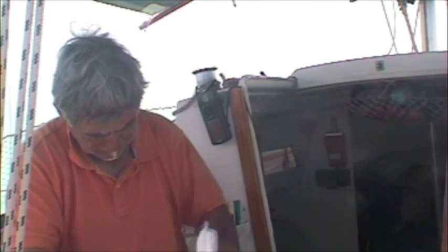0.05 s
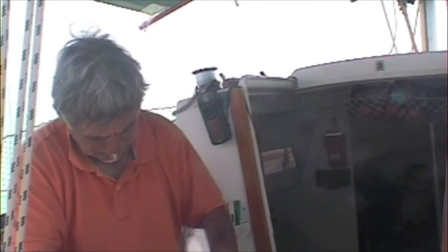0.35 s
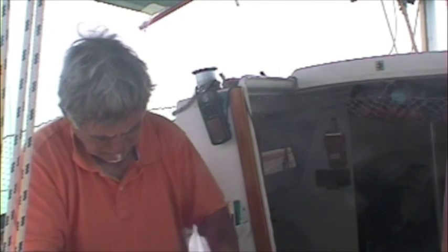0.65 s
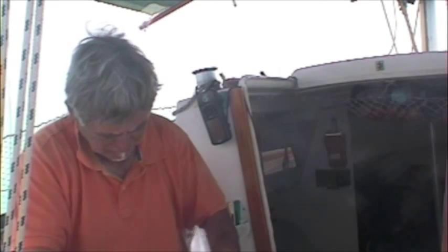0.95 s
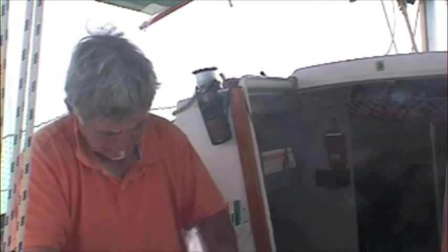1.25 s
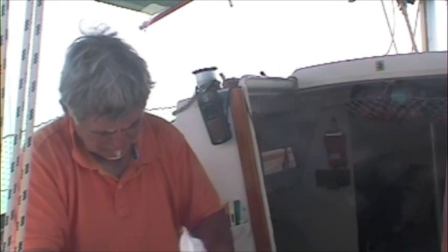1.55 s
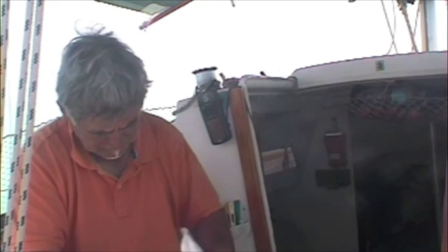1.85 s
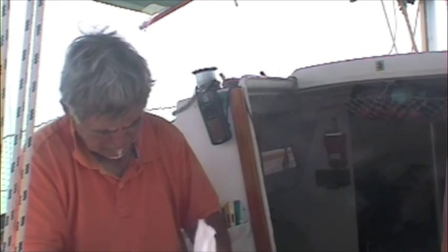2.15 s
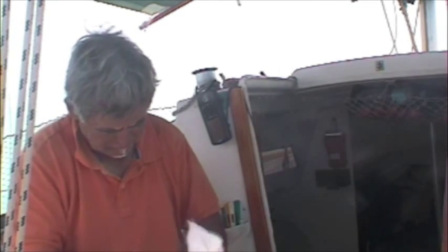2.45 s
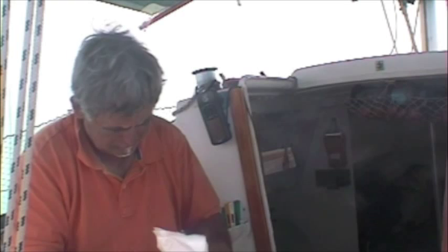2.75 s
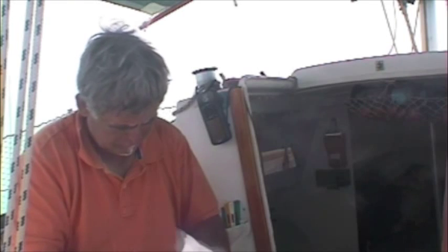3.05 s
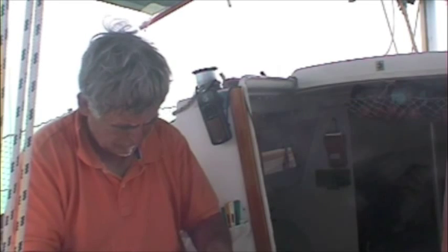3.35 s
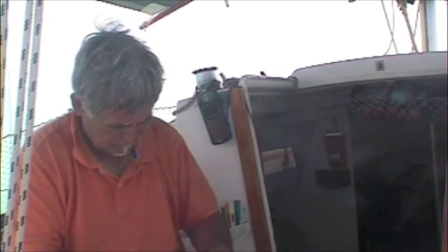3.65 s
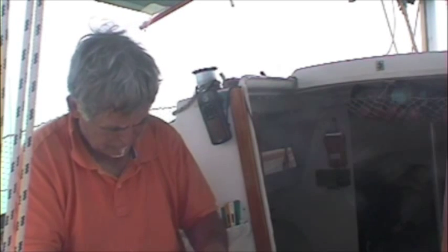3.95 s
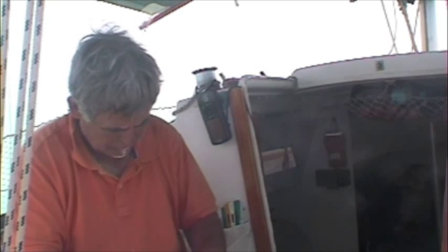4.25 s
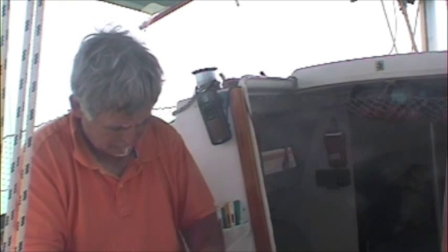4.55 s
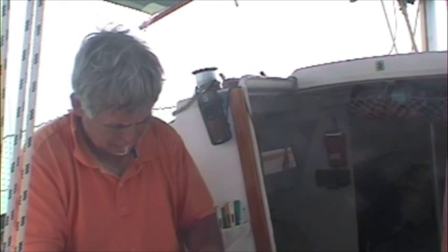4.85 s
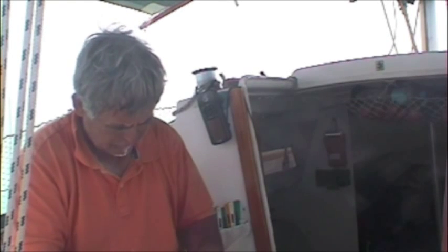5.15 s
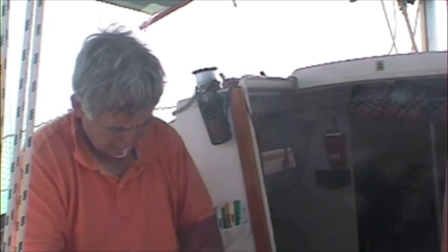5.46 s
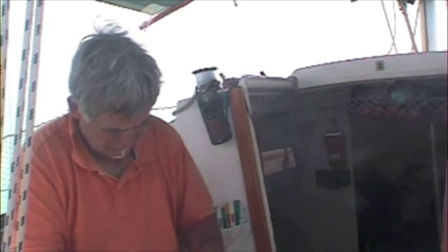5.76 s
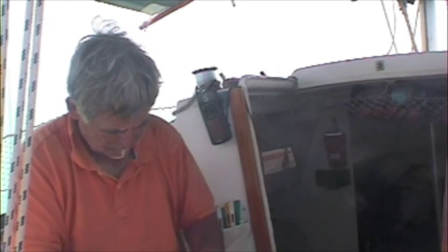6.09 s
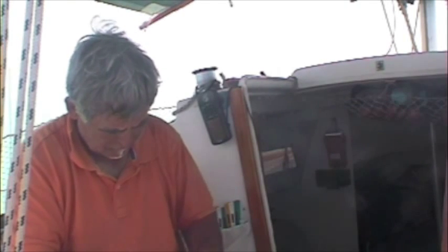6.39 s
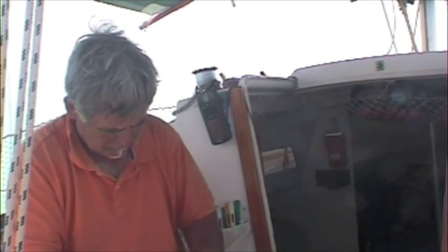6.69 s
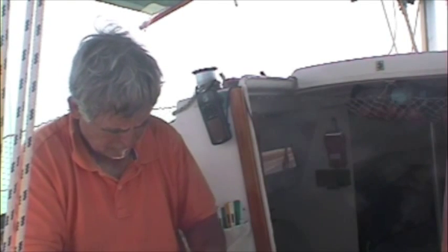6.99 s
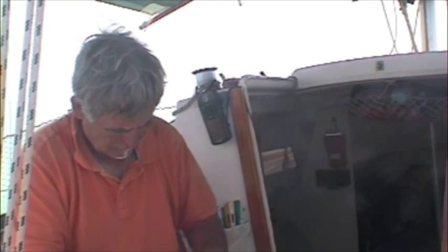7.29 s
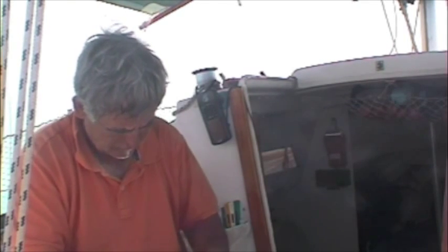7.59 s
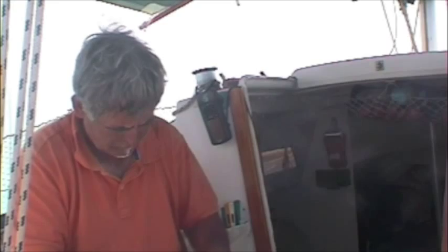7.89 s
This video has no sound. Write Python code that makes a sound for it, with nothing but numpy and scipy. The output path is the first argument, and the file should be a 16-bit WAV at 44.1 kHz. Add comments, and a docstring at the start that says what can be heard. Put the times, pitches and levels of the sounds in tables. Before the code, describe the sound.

A plastic packet is squeezed and shaken close to the microphone in the open cockpit of a small boat, sharp creases snapping over a fine rustle. After a second, wind starts to buffet the microphone now and then, with dull knocks and soft deep thuds in between. From about halfway a pan rings faintly along with the crinkling. The gusts grow stronger near the end while the crackling carries on over a soft outdoor hush.

```python
"""A plastic packet is squeezed, shaken and emptied over a pan in the cockpit of a small boat. From the start,
creases snap through over a rustle of tiny ones, scattered by close walls, in a soft hush. After a second, gusts
begin to buffet the microphone, thudding deep where they strike it unevenly, and dull knocks come in between.
Near four seconds the packet is lowered over the pan, which rings along from then on. The wind peaks just after
six seconds and stays up while the crackling runs on to the end."""
import sys
import numpy as np
from scipy import signal
from scipy.fft import rfft, irfft
from scipy.io import wavfile
from scipy.ndimage import uniform_filter1d

SR = 44100
rng = np.random.default_rng(int(sys.argv[2]) if len(sys.argv) > 2 else 0)


def output_pcm(signal):
    """Save a mono or channel-first signal as 16-bit PCM at the path in sys.argv[1].

    Samples are clipped to [-1, 1] before scaling.
    """
    pcm = np.clip(np.atleast_2d(signal).T, -1, 1) * 32767
    wavfile.write(sys.argv[1], SR, np.round(pcm).astype(np.int16))


N = 358528

# big creases snapping through: start_s, level_db, pitch_hz, relative_boom_db, direct_share (0-1)
CREASE_SNAPS = [(0.081, -35.5, 6900, -17, 0.1), (0.1537, -33.5, 7100, -32, 0.35),
                (0.176, -28, 7050, -35, 0), (0.274, -30, 6500, -20, 0.17), (0.2917, -24, 6550, -22, 0.04),
                (0.363, -34.5, 4250, -19, 0.5), (0.3963, -33.5, 5370, -13, 0.5),
                (0.4457, -31.5, 3580, -10, 0.15), (0.519, -31, 5030, -14, 0.26),
                (0.526, -28, 6140, -16, 0.3), (0.55, -30.5, 5800, -20, 0.1),
                (0.6281, -30.5, 4700, -4.5, 0.36), (0.649, -35, 10100, -25, 0.3),
                (0.666, -31, 3740, -5, 0.1), (0.7, -26, 4350, -17, 0.2), (0.731, -34, 2860, -6, 0.4),
                (0.779, -28.5, 3900, -7.5, 0.4), (0.8215, -30.5, 5540, -11, 0.04),
                (0.937, -31.5, 4800, -7.5, 0.03), (0.97, -29, 4700, -7.5, 0.0),
                (1.0372, -29.5, 4470, -12, 0.5), (1.078, -34.5, 5000, -6, 0.5),
                (1.102, -31.5, 5840, -12.5, 0.1), (1.17, -28.5, 6660, -17, 0.2),
                (1.201, -33.5, 4300, -10, 0.64), (1.2246, -36, 6900, -22, 0.3),
                (1.2422, -29, 7440, -28, 0.4), (1.26, -28, 5200, -12.5, 0.15),
                (1.325, -23, 5430, -32, 0.57), (1.4813, -26, 5150, -7, 0.63), (1.542, -29, 7250, -16, 0.3),
                (1.5531, -35, 7200, -27, 0.2), (1.605, -31, 4500, -16, 0.2), (1.613, -24, 3740, -9.5, 0.7),
                (1.6662, -22, 6100, -21, 0.3), (1.7106, -36, 6300, -16, 0.3), (1.719, -27, 4930, -8, 0),
                (1.8048, -34, 5170, -13, 0.4), (1.842, -24, 5530, -13, 0.2), (1.854, -19, 7600, -36, 0.5),
                (1.873, -26, 6650, -33, 0.06), (1.9295, -26.5, 5700, -16, 0.4),
                (1.9686, -32.5, 5440, -6.5, 0.4), (2.0079, -26.5, 7450, -12, 0.6),
                (2.04, -41, 7000, -22, 0.9), (2.053, -28, 4470, -12, 0.14), (2.1192, -32, 4670, -26, 0.8),
                (2.142, -38.5, 4870, -10, 0.7), (2.236, -39, 4770, -3, 0.1), (2.326, -47.5, 6300, -2, 0.3),
                (2.4153, -32, 6040, -12, 0.75), (2.436, -31, 8700, -34, 0.15),
                (2.5614, -25.5, 5200, -10.5, 0.2), (2.616, -24.5, 5400, -13.5, 0.4),
                (2.65, -33, 6000, -6.5, 0.4), (2.666, -27.5, 5300, -10, 0.06),
                (2.6978, -25.5, 6300, -33, 0.5), (2.7546, -30.5, 5500, -20, 0.5),
                (2.7942, -30, 4700, -29, 0.4), (3.0094, -31.5, 5830, -24, 0.4),
                (3.036, -31, 5340, -11, 0.4), (3.056, -26.5, 5040, -14, 0), (3.0642, -23, 6760, -14, 0),
                (3.106, -39, 7000, -27, 0.7), (3.14, -29.5, 4670, -16, 0.3), (3.163, -36, 6000, -20, 0.2),
                (3.1707, -32, 5700, -14, 0.4), (3.2482, -27, 5930, -17, 0.8),
                (3.2978, -29.5, 6040, -4, 0.6), (3.3165, -24, 7400, -12, 0.3),
                (3.3617, -38, 5530, -28, 0.4), (3.4082, -31.5, 5000, -20, 0.3),
                (3.4343, -27.5, 6840, -13.5, 0.15), (3.5573, -29.5, 6030, -23, 0.4),
                (3.6462, -29.5, 9000, -26, 0.4), (3.7642, -32, 4760, -14, 0.2),
                (3.7991, -32, 5430, -8, 0.34), (3.864, -36.5, 4350, -2, 0),
                (3.9193, -31.5, 7140, -23, 0.77), (3.9984, -34, 4200, -27, 0.4),
                (4.0248, -40, 6000, -14, 0.8), (4.043, -31, 5650, -1, 0.5), (4.102, -30, 6000, -20, 0.4),
                (4.121, -28.5, 5850, -10, 0.3), (4.1417, -39, 6540, -18, 0.9), (4.219, -43, 6900, -40, 0.3),
                (4.246, -36, 4500, -24, 0.2), (4.287, -28.5, 4670, -8, 0.3), (4.326, -26, 6400, -15, 0.2),
                (4.373, -25, 6400, -23, 0.64), (4.597, -33, 6000, -22, 0.5),
                (4.6062, -27, 5640, -16.5, 0.3), (4.639, -32.5, 5500, -14, 0.5), (4.745, -24, 6050, -11, 0),
                (4.7564, -26.5, 5530, -6, 0.2), (4.8163, -26, 7160, -20, 0.7),
                (4.854, -26.5, 8400, -13, 0.14), (4.941, -32, 6700, -15, 0.5),
                (4.9726, -37, 5500, -19, 0.2), (4.979, -30, 9500, -28, 0.7), (5.0125, -28, 5570, -10.5, 0),
                (5.035, -24, 5400, -13, 0.06), (5.065, -29, 5260, -26, 0.3), (5.1575, -38, 6500, -22, 0.7),
                (5.176, -27.5, 5940, -30, 0.25), (5.2104, -28, 4230, -7.5, 0.5),
                (5.245, -23.5, 6100, -13.5, 0.35), (5.3254, -26.5, 5070, -19, 0.7),
                (5.421, -27, 5160, -17, 0.03), (5.497, -24.5, 4030, -36, 0.4),
                (5.508, -23, 5200, -9.5, 0.34), (5.54, -26, 6640, -10, 0.5), (5.591, -32, 6500, -15, 0.3),
                (5.6302, -29, 5600, -33, 0.25), (5.6674, -26, 5950, -16, 0.4),
                (5.6733, -27.5, 5900, -18, 0.5), (5.7193, -31, 6000, -20, 0.6),
                (5.7439, -25, 4900, -11, 0.16), (5.765, -28, 4100, -20, 0.65),
                (5.798, -32.5, 3850, -18, 0.16), (5.8295, -37, 8000, -26, 0.6),
                (5.8535, -26, 2860, -31, 0.17), (5.8784, -28, 5500, -18, 0.15),
                (5.918, -25.5, 5670, -11.5, 0.5), (6.034, -34, 5350, -32, 0.8),
                (6.1558, -24, 5400, -35, 0.1), (6.1765, -18, 6900, -18, 0.35), (6.182, -30, 6000, -15, 0.1),
                (6.2414, -26, 6450, -22, 0.2), (6.251, -24, 6500, -11, 0.3), (6.333, -29, 5030, -7.5, 0.15),
                (6.392, -32.5, 6900, -15, 0.3), (6.42, -29.5, 6500, -9, 0.2),
                (6.4687, -29.5, 5560, -15, 0.45), (6.477, -26.5, 6500, -4, 0.6),
                (6.516, -24.5, 3740, -13, 0.05), (6.5386, -26, 4270, -15, 0.1),
                (6.567, -23.5, 7640, -11, 0.2), (6.651, -28, 3350, -22, 0.1), (6.684, -28, 4900, -29, 0),
                (6.7776, -25.5, 5150, -28, 0.25), (6.806, -32.5, 6400, -8, 0.4),
                (6.856, -30, 5500, -17, 0.7), (6.8918, -31.5, 5840, -14, 0.6),
                (6.9349, -34.5, 6500, -16, 0.7), (6.9866, -25.5, 4800, -10, 0.13),
                (7.022, -30, 5300, -21, 0.3), (7.0565, -34, 6500, -20, 0.4), (7.0624, -30, 4330, -6.5, 0.7),
                (7.105, -27.5, 4060, -6, 0.03), (7.1302, -22.5, 5700, -30, 0.03),
                (7.161, -20, 5760, -34, 0.13), (7.2708, -30.5, 4570, -14, 0), (7.326, -27, 4650, -32, 0.1),
                (7.3488, -35, 5700, -8, 0.6), (7.3867, -31.5, 5600, -7, 0.7), (7.4167, -34, 5330, -7, 0.3),
                (7.4257, -25.5, 5200, -20, 0.06), (7.5362, -21.5, 4780, -10, 0.13),
                (7.556, -23, 4870, -32, 0.02), (7.6356, -23.5, 5150, -7.5, 0.3),
                (7.6725, -31, 8000, -25, 0.5), (7.681, -28, 5330, -7, 0.35), (7.7156, -25, 6450, -13, 0.4),
                (7.718, -26, 6340, -11.5, 0.8), (7.7708, -23, 4400, -8.5, 0.25),
                (7.826, -28, 6240, -30, 0.05), (7.8465, -28.5, 4800, -18, 0.08),
                (7.9095, -29.5, 4440, -5, 0.15), (7.964, -31, 4770, -5, 0.1), (8.004, -33, 4970, -14, 0.2),
                (8.0271, -24.5, 4970, -37.5, 0.6), (8.043, -24, 4730, -40, 0.4),
                (8.068, -26, 4930, -14.5, 0.4), (8.101, -25.5, 7900, -21, 1)]
# the hands squeeze or shake the packet: start_s, length_s, crackle_db, panel_db
SQUEEZES = [(0, 0.022, -41, -44), (0.105, 0.11, -47, -50.5), (0.236, 0.073, -35, -44),
            (0.348, 0.028, -36, -50), (0.436, 0.036, -43, -62), (0.507, 0.033, -36.5, -52),
            (0.6, 0.14, -41, -52), (0.765, 0.042, -39.5, -48), (0.883, 0.092, -44, -53.5),
            (0.996, 0.083, -39, -51.5), (1.196, 0.24, -42.5, -50), (1.325, 0.17, -39, -47),
            (1.524, 0.15, -41.5, -50), (1.646, 0.1, -38.5, -47.5), (1.813, 0.17, -38.5, -47),
            (2.017, 0.11, -36, -46.5), (2.154, 0.036, -36.5, -47), (2.374, 0.11, -41, -49),
            (2.532, 0.033, -35.5, -49), (2.596, 0.11, -36.5, -48), (2.71, 0.13, -47.5, -61),
            (2.949, 0.026, -38, -44.5), (3.014, 0.056, -33.5, -51), (3.171, 0.073, -36.5, -45.5),
            (3.242, 0.12, -37.5, -52), (3.432, 0.077, -45, -52), (3.518, 0.21, -46.5, -51),
            (3.737, 0.19, -43, -51.5), (3.96, 0.22, -40, -49), (4.191, 0.15, -33.5, -52),
            (4.361, 0.2, -36.5, -47.5), (4.583, 0.077, -31.5, -47.5), (4.683, 0.035, -34.5, -53),
            (4.705, 0.059, -30, -38.5), (4.811, 0.14, -34.5, -49), (4.958, 0.19, -33.5, -44),
            (5.178, 0.17, -34, -44.5), (5.372, 0.17, -33.5, -45.5), (5.633, 0.061, -30, -42),
            (5.77, 0.26, -37.5, -46.5), (6.055, 0.13, -33.5, -42.5), (6.209, 0.19, -34, -46.5),
            (6.438, 0.14, -38, -52), (6.594, 0.13, -31.5, -42), (6.785, 0.096, -35, -47),
            (6.91, 0.21, -37, -50.5), (7.117, 0.1, -33, -44), (7.236, 0.14, -35, -45.5),
            (7.425, 0.16, -35, -45.5), (7.491, 0.16, -36.5, -45.5), (7.655, 0.14, -36, -52),
            (7.805, 0.052, -35, -42), (7.933, 0.073, -35.5, -47), (8.027, 0.084, -30.5, -43.5)]
# tone of the film's snaps, its fine crackle and its flexing panels: frequency_hz, gain_db
SNAP_EQ = [(500, -26.5), (1500, 4), (2500, 1.5), (4500, -1), (7000, 2), (8500, -4), (10300, 1), (13000, 0),
           (16000, -8.5)]
CRACKLE_EQ = [(600, -19), (1500, -0.5), (2300, 2.5), (3200, 2.5), (4500, 3), (7000, 1.5), (8500, -5),
              (10300, -3.5), (13000, -6), (16000, -16)]
PANEL_EQ = [(100, -24), (290, -16), (375, 1), (440, 2), (505, 5), (680, 0), (860, -1), (1120, 1.5),
            (1450, -6.5), (2200, -0.5), (5000, -36.5)]
# slapback off the nearest surfaces, set against the diffuse scatter: delay_s, level_db
WALL_SLAPS = [(0.0027, -7.5), (0.0057, -9)]
# narrow resonances of the hollows around the packet: pitch_hz, width_hz, gain_db
HOLLOW_MODES = [(1136, 21, -5), (1299, 15, 2.5), (1461, 62, 0.5), (2800, 50, -19), (4450, 540, -11)]
# dull knocks from handling and from contents dropping into the pan: start_s, level_db, pitch_hz, width_hz,
# t60_s, direct_share (0-1)
KNOCKS = [(1.44, -38, 520, 300, 0.044, 0.2), (1.677, -39, 516, 300, 0.037, 0.2),
          (2.977, -38, 550, 200, 0.055, 0), (3.434, -46, 294, 140, 0.54, 0.1),
          (3.483, -41, 382, 120, 0.059, 0), (3.514, -42, 915, 450, 0.096, 0.2),
          (4.083, -37, 537, 240, 0.067, 0.3), (4.136, -37, 524, 260, 0.054, 0.4),
          (4.26, -35.5, 573, 260, 0.05, 0.14), (4.277, -38, 530, 240, 0.054, 0.4),
          (4.305, -32.5, 610, 260, 0.054, 0.2), (4.453, -37, 604, 300, 0.038, 0.2),
          (4.504, -32.5, 573, 260, 0.035, 0.5), (4.756, -29, 640, 500, 0.035, 0.3),
          (5.12, -38.5, 600, 160, 0.11, 0.2), (5.462, -34.5, 520, 140, 0.046, 0.3),
          (5.496, -36, 556, 300, 0.06, 0), (5.548, -37, 544, 300, 0.033, 0.3),
          (5.857, -31, 1530, 1200, 0.062, 0.4), (6.201, -33, 580, 161, 0.024, 0),
          (6.652, -27, 1170, 400, 0.053, 0.3), (6.941, -29, 1230, 420, 0.049, 0.5),
          (6.975, -41, 517, 240, 0.07, 0), (7.043, -35, 500, 160, 0.048, 0.4),
          (7.208, -41, 490, 280, 0.13, 0.02), (7.221, -33, 1200, 900, 0.055, 0.2),
          (7.488, -39, 405, 200, 0.089, 0.2), (7.546, -35, 560, 262, 0.061, 0.13)]
# stereo width of the packet: frequency_hz, side_gain_db
SIDE_EQ = [(500, 3.5), (900, 3.5), (1400, -11), (2400, 2), (5500, -2), (7200, -0.5), (8600, 6.5),
           (13000, 2.5)]
# deep thuds from eddies striking the ports unevenly: crest_s, level_db, pitch_hz, half_length_s
THUDS = [(1.025, -45, 115, 0.013), (3.39, -56, 71.5, 0.022), (5.59, -46, 106, 0.016),
         (6.06, -43, 57.6, 0.02), (6.1, -51, 124, 0.036), (6.179, -47, 80.4, 0.02),
         (6.355, -46, 84.4, 0.027), (6.43, -55, 95, 0.026), (6.54, -52, 144, 0.018),
         (7.438, -49.5, 78, 0.028), (7.695, -40.5, 86, 0.019), (7.82, -48, 130, 0.014),
         (8.034, -48, 73, 0.017)]
# single eddies hitting the microphone: crest_s, level_db, pitch_hz, half_length_s
EDDIES = [(1.03, -18, 90, 0.023), (1.142, -28, 60, 0.014), (1.206, -32, 80, 0.029),
          (3.04, -31.9, 59, 0.045), (3.113, -21, 96, 0.017), (3.192, -29, 86, 0.026),
          (3.26, -39, 62, 0.009), (3.382, -23.5, 78, 0.017), (4.727, -34, 87, 0.024),
          (4.85, -25, 76, 0.018), (4.974, -33, 55, 0.045), (5.063, -31, 55, 0.016),
          (5.192, -29.1, 68, 0.012), (5.242, -29, 86, 0.039), (5.391, -34, 86, 0.018),
          (5.498, -37, 76, 0.014), (5.596, -25, 66, 0.038), (5.769, -28, 82, 0.059),
          (5.872, -33, 70, 0.012), (6.007, -24, 92, 0.016), (6.173, -22, 86, 0.032),
          (6.334, -19.5, 91, 0.039), (6.459, -21, 84, 0.017), (6.541, -18, 87, 0.01),
          (6.61, -23, 98, 0.015), (7.163, -29.0, 82, 0.017), (7.275, -30, 82, 0.017),
          (7.316, -25, 88, 0.012), (7.425, -26, 68, 0.022), (7.545, -18, 77, 0.017),
          (7.598, -26, 76, 0.038), (7.713, -15.7, 87, 0.021), (7.819, -18, 95, 0.016),
          (7.9, -26, 88, 0.019), (7.967, -27, 101, 0.019), (8.039, -26, 82, 0.046)]
# strength of the breeze: time_s, level_db
BREEZE_CURVE = [(0, -50), (0.4, -52), (0.8, -41), (0.95, -50.2), (1.15, -35), (1.3, -46), (2.2, -52),
                (2.8, -45.7), (3.25, -43), (3.55, -51.1), (4.55, -48.5), (4.95, -40), (5.9, -38),
                (6.2, -21), (6.55, -34), (6.85, -38), (7.25, -31), (8.13, -36)]
# tone of the wind rumble and of the outdoor hush: frequency_hz, gain_db
WIND_EQ = [(15, -9), (40, -2), (65, 0), (88, 0), (120, -5), (200, -14), (300, -28), (500, -42), (1500, -65)]
HUSH_EQ = [(20, -12), (60, -8.5), (100, -0.5), (150, 0.5), (220, 2), (300, -2.5), (380, 3), (540, -2),
           (700, -3.5), (1100, -7.5), (2300, -15), (4200, -32), (7600, -16.5), (8700, -29), (10000, -25),
           (12500, -30), (15500, -41)]
# faint high whirr in the hush: pitch_hz, width_hz, level_db
WHIRR_BANDS = [(1020, 110, -66), (3060, 130, -63.5), (3600, 200, -65), (4590, 55, -62), (5600, 170, -62.5),
               (6700, 130, -68)]

FLIP = np.array([[1], [-1]])  # left plus, right minus


def snaps(crack_db=-0.29, crack_width=0.71, ring_db=-4.5, ring_q=7, ring_spread=0.401, panning_db=0.5):
    """Each crease cracks at its own pitch, rings the facets beside it and jolts the panel around it."""
    out, film_tone, panel_tone = np.zeros((2, N)), response(SNAP_EQ), response(PANEL_EQ)
    for start_s, level_db, hz, boom_db, direct in CREASE_SNAPS:
        pulse = buckle(direct, t60=0.06)
        facet_pitches = hz * np.exp(ring_spread * rng.standard_normal(4))
        facets = energy_one(sum(resonate(pulse, f, f / ring_q) for f in facet_pitches))
        crease = energy_one(resonate(pulse, hz, hz * crack_width))
        crack = through(crease + from_db(ring_db) * facets, film_tone)
        boom = through(scatter(direct * 0.25, t60=0.06, alike=0.83, rise_s=0.0016), panel_tone)
        snap = from_db(crack_db) * energy_one(crack) + from_db(boom_db) * energy_one(boom)
        gain = from_db(level_db + FLIP * panning_db * rng.standard_normal())
        add(out, start_s, snap * np.sqrt(0.0051 * SR) * gain)
    return out


def buckle(direct, t60, stutter_s=0.00054, smear_s=0.0011, alike=0.75, size=5000):
    """A crease gives way in a brief stutter; near walls slap it back and the cockpit scatters the rest."""
    t = np.arange(size) / SR
    stutter = energy_one(rng.standard_normal(size) * np.exp(-t / stutter_s))
    returned = scatter(0, t60, alike, size=size)
    for delay_s, level_db in WALL_SLAPS:
        slap = (t >= delay_s) * np.exp(-abs(t - delay_s) / smear_s)
        returned += from_db(level_db) * energy_one(stereo_noise(alike, size) * slap)
    return np.sqrt(direct) * stutter + np.sqrt(1 - direct) * energy_one(returned)


def rustle(crackle_db=-0.62, panel_db=-0.76, crease_width=0.75, patchy_db=3.5, lumpy_db=3.0, patches=30):
    """Tiny creases all over the packet: each patch of film has its own pitch and its own reflections."""
    crackle_gain, flex_gain = squeezes()
    panel_gain = flex_gain * from_db(lumpy_db * drift(17.6))
    clicks = tiny_creases(per_s=1000, spread_db=4.0, clump_db=2.0, even_s=0.019)
    # strain wanders from patch to patch; the more a patch holds, the more creases fall on it
    strain = np.cumsum([from_db(patchy_db * drift(14)) ** 2 for _ in range(patches)], axis=0)
    patch = np.sum(strain < rng.random(N) * strain[-1], axis=0)
    crackle, flex = np.zeros((2, 2, N))
    for k, hz in enumerate(np.geomspace(1500, 13000, patches)):
        patch_clicks = (clicks * (patch == k))[None]
        pulse = buckle(0.37, t60=0.041, alike=0.7)
        voice = energy_one(resonate(pulse, hz, hz * crease_width)) * np.sqrt(hz / 5500)
        crackle += through(patch_clicks * crackle_gain, voice)
        flex += through(patch_clicks * panel_gain, scatter(0.081, t60=0.027, alike=0.84))
    crackle = through(crackle, response(CRACKLE_EQ)) * from_db(crackle_db)
    return crackle + through(flex, energy_one(response(PANEL_EQ))) * from_db(panel_db)


def squeezes(attack_s=0.033, release_t60=0.17, waver_db=1.42, waver_rate=14):
    """Crackle and panel gains: each squeeze builds, holds and fades as the film relaxes; the grip wavers."""
    power = np.zeros((2, N))
    for start_s, length_s, crackle_db, panel_db in SQUEEZES:
        t = np.arange(int((length_s + release_t60) * SR)) / SR
        envelope = np.minimum(t / attack_s, 1) * from_db(-60 * np.maximum(t - length_s, 0) / release_t60)
        add(power, start_s, (from_db([[crackle_db], [panel_db]]) * envelope) ** 2)
    return np.sqrt(power) * from_db(waver_db * drift(waver_rate))


def tiny_creases(per_s, spread_db, clump_db, even_s):
    """Clicks of very uneven size that come in little avalanches; their power is held near 1."""
    born = rng.random(N) < per_s / SR
    sizes = from_db(spread_db * np.minimum(rng.exponential(1, N), 4) + clump_db * drift(66))
    clicks = born * sizes * rng.choice([-1, 1], N)
    span = int(even_s * SR)
    power = uniform_filter1d(uniform_filter1d(clicks ** 2, span), span)
    return clicks / np.sqrt(np.maximum(power, 1e-2))


def knocks(size=12000):
    """Soft knocks as the packet is handled and its contents drop into the pan, each a short dull ring in one
    band."""
    out = np.zeros((2, N))
    for start_s, level_db, hz, width_hz, t60, direct in KNOCKS:
        contact = scatter(direct, t60, alike=0.84, size=size)
        ring = energy_one(resonate(resonate(contact, hz, width_hz), hz, width_hz))
        add(out, start_s, from_db(level_db) * ring * np.sqrt(t60 * SR / np.log(10 ** 6)))
    return out


def scatter(direct, t60, alike, rise_s=0.0019, late_db=-21, late_t60=0.16, size=5000):
    """A pulse in the cockpit: the direct hit, close reflections that bloom and die, a faint late tail."""
    t = np.arange(size) / SR
    decay = from_db(-60 * t / t60) + from_db(late_db - 60 * t / late_t60)
    envelope = (1 - np.exp(-t / rise_s)) * decay
    pulse = np.sqrt(1 - direct) * energy_one(stereo_noise(alike, size) * envelope)
    pulse[:, 0] += np.sqrt(direct)
    return pulse


def wall_echo(x, delay_s=0.00667, gain=0.3, dull_hz=4000):
    """The back of the film radiates in opposite phase; a wall returns that wave and hollows the tone."""
    late = np.pad(x, ((0, 0), (round(delay_s * SR), 0)))[:, :N]
    return x - gain * lowpass(late, dull_hz)


def cockpit_ring(x, over_pan_s=3.9, lowering_s=0.3, pan_hz=2170, pan_width_hz=55, pan_db=-8):
    """The hollows ring briefly in sympathy, and so does the pan once the packet is lowered over it."""
    over_pan = np.clip((np.arange(N) / SR - over_pan_s) / lowering_s + 1, 0, 1)
    pan = from_db(pan_db) * resonate(x * over_pan, pan_hz, pan_width_hz)
    return x + pan + sum(from_db(db) * resonate(x, hz, width_hz) for hz, width_hz, db in HOLLOW_MODES)


def widen(x):
    """The microphone pair tells directions apart better at some frequencies than at others."""
    side = (x[:1] - x[1:]) / 2
    return x.mean(0) + FLIP * through(side, response(SIDE_EQ))


def lean(x, body_db=-1.18, top_db=1.0, split_hz=8000):
    """The body of the sound sits a little to the right, its top a little to the left."""
    body = lowpass(x, split_hz)
    return body * from_db(FLIP * body_db) + (x - body) * from_db(FLIP * top_db)


def thuds():
    """Deep thuds where eddies strike the two microphone ports unevenly: the part that reaches both alike, dead
    centre."""
    out = np.zeros((2, N))
    for crest_s, level_db, hz, half_s in THUDS:
        thud = churn(hz, half_s, relative_width=0.6, top_hz=240)
        add(out, crest_s - len(thud) / 2 / SR, from_db(level_db) * thud[None])
    return out


def wind(lumpy_db=2.5, eddy_trim_db=1.0):
    """Lumpy turbulence and single churning eddies, in opposite phase at the two microphone ports."""
    breeze_db = np.interp(np.arange(N) / SR, *np.transpose(BREEZE_CURVE))
    rumble = FLIP * through(rng.standard_normal((1, N)), response(WIND_EQ, size=8192))
    out = from_db(breeze_db) * rms_one(rumble * from_db(lumpy_db * drift(16)))
    for crest_s, level_db, hz, half_s in EDDIES:
        eddy = churn(hz, half_s, relative_width=0.63, top_hz=185)
        add(out, crest_s - len(eddy) / 2 / SR, from_db(level_db + eddy_trim_db) * FLIP * eddy)
    return out


def churn(hz, half_s, relative_width, top_hz, size=12000):
    """A short swell of low noise around one pitch; rms near 1 at its crest, in the middle."""
    swell = np.exp(-((np.arange(size) - size / 2) / SR / half_s) ** 2)
    width_hz = hz * relative_width
    band = resonate(resonate(rng.standard_normal(size), hz, width_hz), hz, width_hz)
    return energy_one(lowpass(band, top_hz, order=2) * swell) * np.linalg.norm(swell)


def hush(level_db=-52):
    """A steady bed of outdoor air with a faint high whirr."""
    air = from_db(level_db) * rms_one(through(stereo_noise(0.36, N), response(HUSH_EQ, size=4096)))
    whirr = sum(from_db(db) * rms_one(resonate(stereo_noise(0.047, N), hz, width_hz))
                for hz, width_hz, db in WHIRR_BANDS)
    return air + whirr


def from_db(db):
    """Decibels to gain."""
    return 10 ** (np.asarray(db) / 20)


def rms_one(x):
    """Scale to an rms of 1."""
    return x / np.sqrt(np.mean(x ** 2) + 1e-20)


def energy_one(x):
    """Scale to an average energy of 1 per channel."""
    return rms_one(x) / np.sqrt(x.shape[-1])


def add(out, start_s, sound):
    """Mix a sound in at its cue."""
    i = int(np.clip(round(start_s * SR), 0, N - 1))
    out[:, i:i + sound.shape[1]] += sound[:, :N - i]


def drift(rate_hz, hop=40, settle=2000):
    """Smooth random modulation with an rms of 1."""
    pole = np.exp(-2 * np.pi * rate_hz * hop / SR)
    noise = rng.standard_normal(N // hop + settle + 2)
    slow = signal.lfilter([1], [1, -2 * pole, pole * pole], noise)[settle:]
    return np.interp(np.arange(N) / hop, np.arange(len(slow)), rms_one(slow))


def stereo_noise(alike, size):
    """White noise whose left-right correlation is `alike`."""
    mid, side = rng.standard_normal((2, size))
    return np.sqrt((1 + alike) / 2) * mid + np.sqrt((1 - alike) / 2) * side * FLIP


def response(eq, size=2048):
    """Minimum-phase impulse response of an EQ curve."""
    hz, db = np.transpose(eq)
    bin_hz = np.arange(size // 2 + 1) * SR / size
    gain = from_db(np.interp(np.log(bin_hz + 1), np.log(hz), db))
    causal_fold = np.r_[1, np.full(size // 2 - 1, 2), 1, np.zeros(size // 2 - 1)]
    cepstrum = irfft(np.log(gain)) * causal_fold
    return irfft(np.exp(rfft(cepstrum)))[None, :size // 2]


def through(x, impulse):
    """Convolve, keeping the length."""
    return signal.fftconvolve(x, impulse, axes=1)[:, :x.shape[1]]


def resonate(x, hz, width_hz):
    """One two-pole resonance."""
    w = 2 * np.pi * min(hz, SR / 3) / SR
    damp = np.sin(w) * width_hz / (2 * hz)
    return signal.lfilter([damp, 0, -damp], [1 + damp, -2 * np.cos(w), 1 - damp], x + 1e-18)


def lowpass(x, hz, order=1):
    """Roll the top off gently."""
    return signal.sosfilt(signal.butter(order, hz, fs=SR, output="sos"), x)


def scene():
    """The packet and its knocks up front in the cockpit, over deep thuds, wind and hush."""
    packet = widen(cockpit_ring(wall_echo(snaps() + rustle())))
    return lean(packet + knocks()) + thuds() + wind() + hush()


def record(dry):
    """A steep high cut at 15750 Hz."""
    return signal.sosfilt(signal.ellip(10, 0.2, 80, 15750, fs=SR, output="sos"), dry)


dry = scene()
out = record(dry)
output_pcm(out)
```